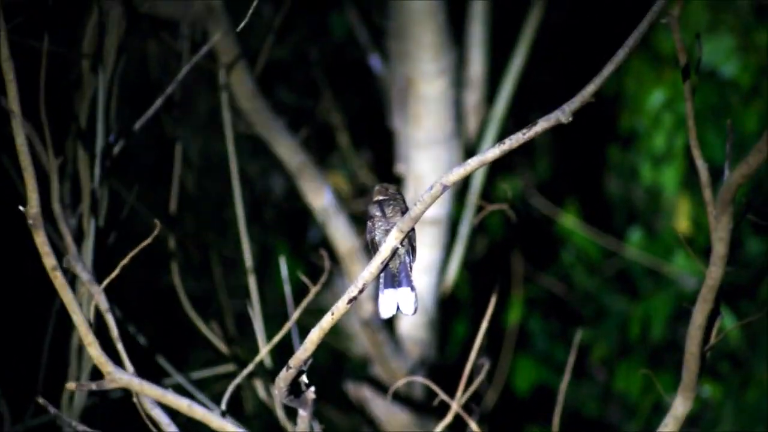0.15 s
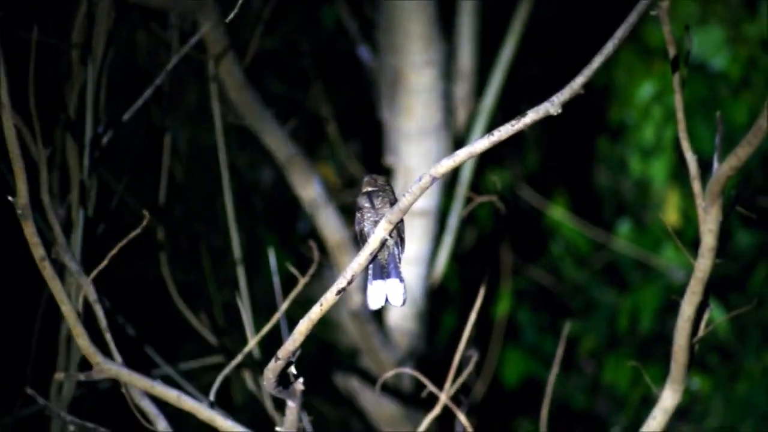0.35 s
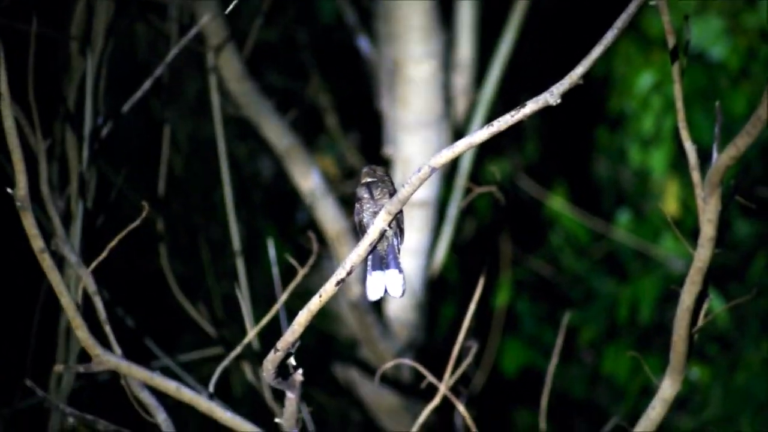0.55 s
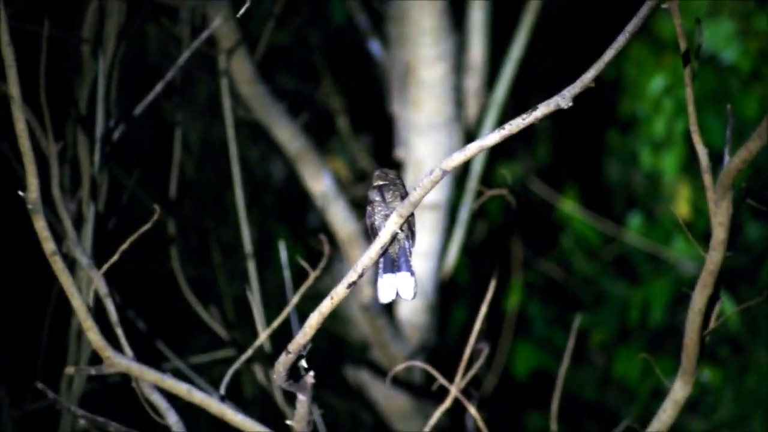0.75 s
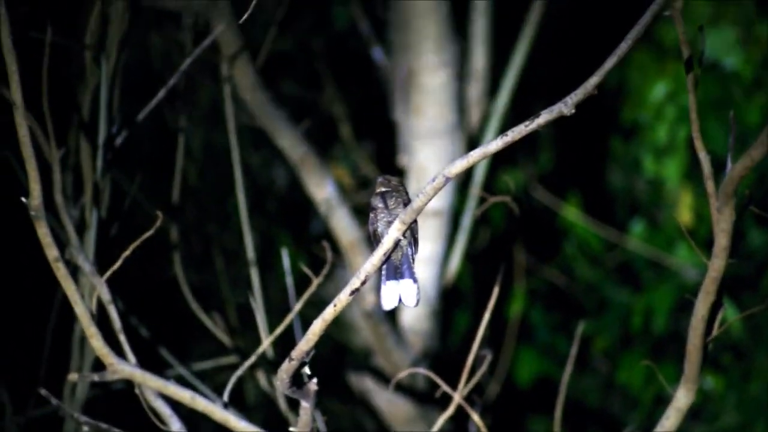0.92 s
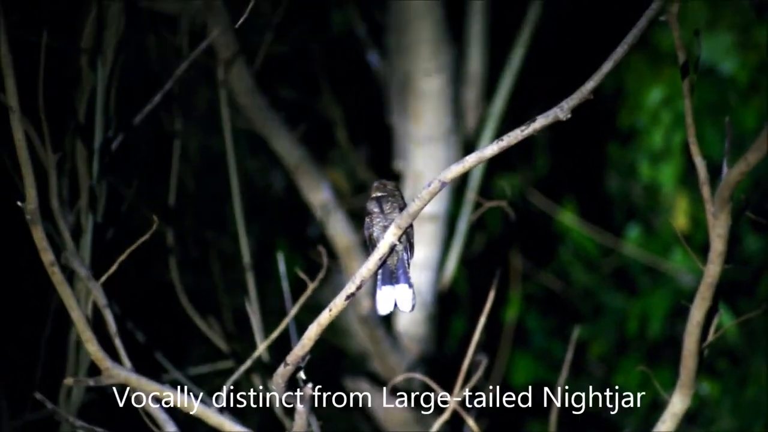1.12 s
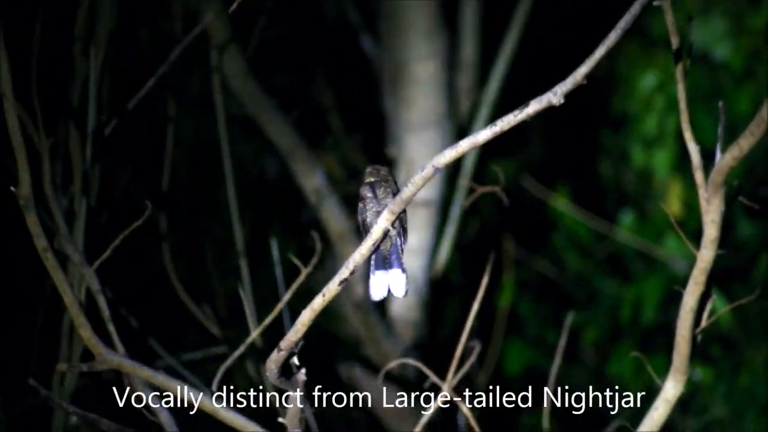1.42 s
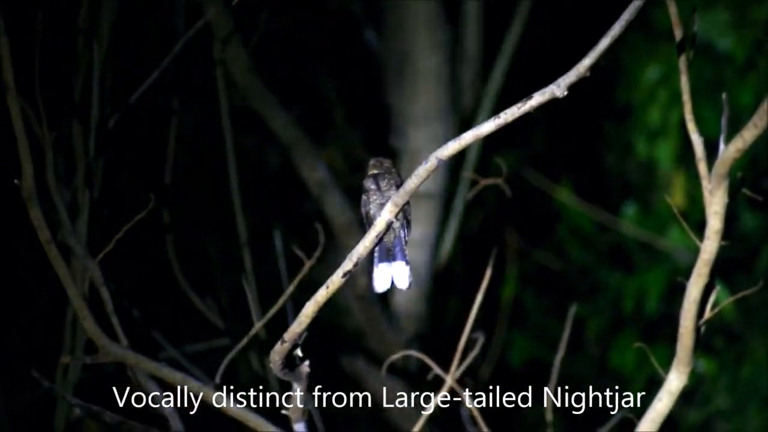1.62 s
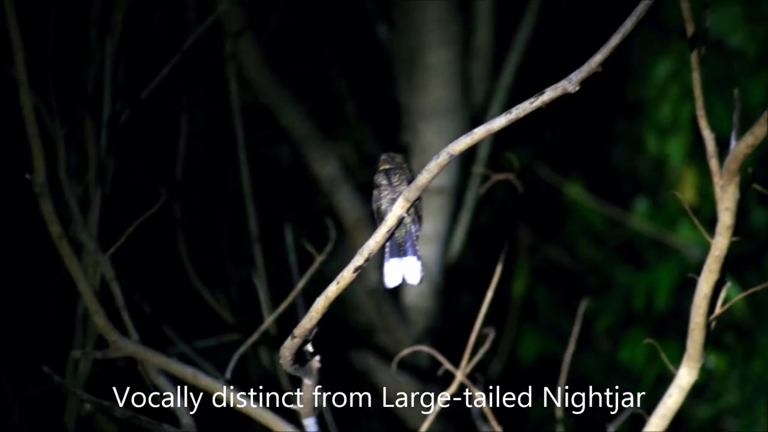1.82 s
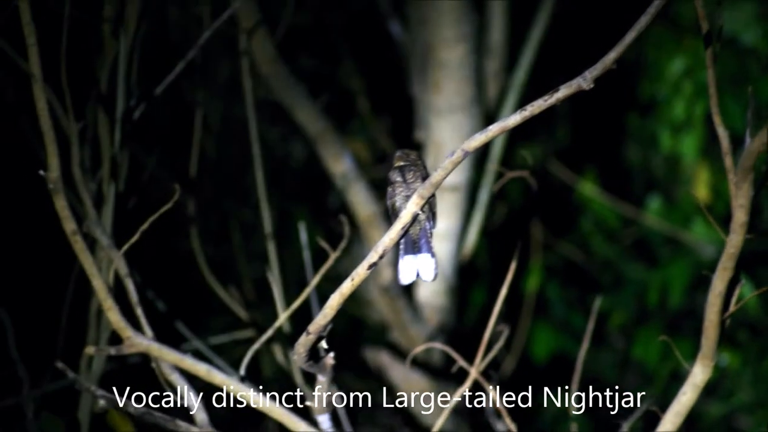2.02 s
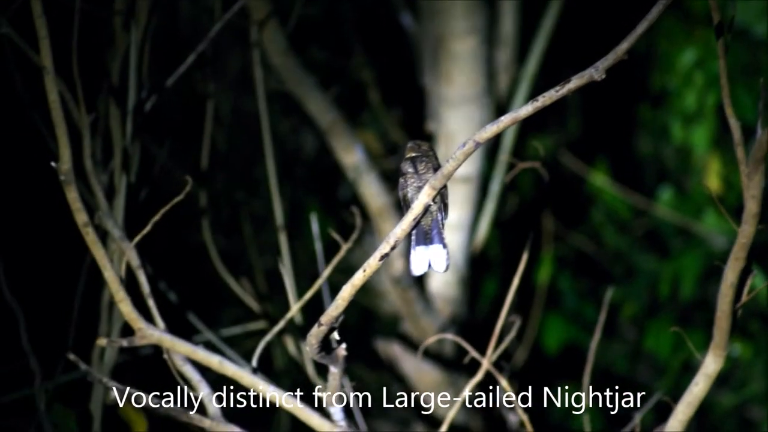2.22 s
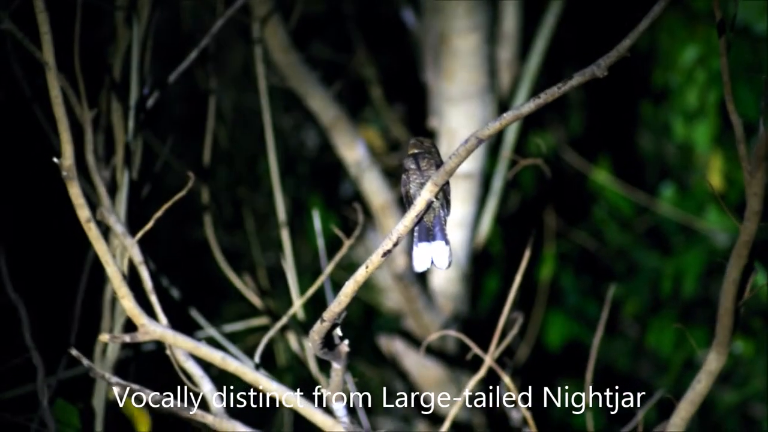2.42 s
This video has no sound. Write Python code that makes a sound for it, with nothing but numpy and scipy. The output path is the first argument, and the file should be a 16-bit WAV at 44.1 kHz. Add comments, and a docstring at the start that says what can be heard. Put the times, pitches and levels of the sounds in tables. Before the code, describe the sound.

In a forest at night, a nightjar near the microphone gives an even run of short, plunging, knock-like notes that echo briefly off the trees. Soft hiss and faint insects continue behind, joined by small ticks and a slight rustle.

```python
"""Nightjar in a night forest

A nightjar on a branch repeats one short, knocking note about 3.5 times a second.
Each note is a whistle that plunges, breaks to a lower register and falls away; ground and trees echo it.
Behind it sit a steady hiss, faint insect choruses, a few small ticks and a soft rustle."""
import sys
import numpy as np
from scipy import signal
from scipy.fft import rfft, irfft
from scipy.io import wavfile
from scipy.ndimage import uniform_filter1d

SR = 44100
rng = np.random.default_rng(int(sys.argv[2]) if len(sys.argv) > 2 else 0)


def transcribe(signal):
    """Save signal, clipped to [-1, 1], as a 16-bit WAV file at the path in sys.argv[1]."""
    frames = np.atleast_2d(signal).T
    limited = np.clip(frames, -1, 1)
    pcm = np.round(limited * 32767).astype(np.int16)
    wavfile.write(sys.argv[1], SR, pcm)


N = 112454


def undb(db):
    """Decibels to gain."""
    return 10 ** (np.asarray(db) / 20)


def unit(x):
    """Scale to rms 1."""
    return x / np.sqrt(np.mean(x ** 2) + 1e-20)


def eq(x, gain):
    """Filter by a gain that is a function of frequency."""
    hz = np.maximum(np.arange(len(x) // 2 + 1) * SR / len(x), 1)
    return irfft(rfft(x) * gain(hz), len(x))


def coloured_noise(curve):
    """Noise of rms 1, shaped by an EQ curve of (freq_hz, gain_db) points."""
    hz, db = np.array(curve).T
    return unit(eq(rng.standard_normal(N), lambda f: undb(np.interp(np.log(f), np.log(hz), db))))


def band_noise(hz, half_width_hz):
    """Noise through the same resonance twice, for steep sides."""
    return eq(rng.standard_normal(N),
              lambda f: 1 / (1 + 1j * (f * f - hz * hz) / (2 * f * half_width_hz)) ** 2)


def drift(rate_hz, size=N):
    """Smooth random modulation, spread near 1."""
    hold = max(int(SR / rate_hz), 1)
    steps = np.repeat(rng.standard_normal(size // hold + 1), hold)
    return uniform_filter1d(steps, hold)[:size]


# Pitch and level envelope of the note, before each call varies it: time_s, pitch_hz, level_db
WHISTLE_CONTOUR = [(0, 1340, -20.2), (.0035, 2100, -33), (.006, 1858, -23.5), (.0125, 1450, -18.3),
                   (.0147, 1640, -20.2), (.0167, 892, -24.3), (.0205, 730, -35), (.025, 894, -22.6),
                   (.0335, 1035, -20.7), (.0355, 1110, -28), (.044, 650, -35), (.053, 620, -39),
                   (.059, 810, -34), (.066, 810, -37)]
BREAK_S, UPTURN_S, ATTACK_S, RELEASE_S = 0.029, 0.063, 0.00089, 0.012
THROAT_HZ, THROAT_HALF_WIDTH_HZ = 4420, 320


def whistle(t, pitch_ratio, stretch, ending_db):
    """One nearly pure note; its low register wavers and ends in a soft upturn."""
    times, hz, db = np.array(WHISTLE_CONTOUR).T
    note_s = np.where(t > BREAK_S, BREAK_S + (t - BREAK_S) / stretch, t)
    waver = 1 + 0.024 * drift(200, len(t)) * (note_s > BREAK_S)
    pitch_hz = pitch_ratio * waver * np.interp(note_s, times, hz)
    phase = 2 * np.pi * np.cumsum(pitch_hz * (note_s > 0)) / SR
    # The third harmonic lifts as it sweeps through the throat resonance.
    third = undb(-30) / (1 + ((3 * pitch_hz - THROAT_HZ) / THROAT_HALF_WIDTH_HZ) ** 2)
    attack = np.clip(note_s / ATTACK_S, 0, 1)
    release = np.clip(1 + (times[-1] - note_s) / RELEASE_S, 0, 1)
    ending = np.clip((note_s - UPTURN_S) / RELEASE_S, 0, 1)
    level = undb(np.interp(note_s, times, db) + ending_db * ending)
    return attack * release * level * (np.sin(phase) + third * np.sin(3 * phase))


# The bird's calls: start_s, gain_db, pitch_ratio, low_register_stretch_ratio, ending_gain_db
CALLS = [(-.068, 0, 1.025, 0.97, -14), (0.2143, 0, 1.005, 1.1, -8), (0.4942, 0.14, 1.001, 1.09, -7),
         (0.7801, 0.4, 1.01, 1.1, -2), (1.0584, -0.26, 1, 1.09, -11), (1.338, -0.5, 0.99, 0.98, -4),
         (1.6225, -0.5, 1, 1.023, 1), (1.9135, -0.15, 1, 0.98, -6), (2.2061, -.7, 0.99, .99, -5)]


def nightjar(t):
    """The dry voice: one whistle repeated, a little different each time."""
    return sum(undb(db) * whistle(t - start, pitch_ratio, stretch, ending_db)
               for start, db, pitch_ratio, stretch, ending_db in CALLS)


# Early reflections off ground and trunks: delay_s, signed_gain
EARLY_REFLECTIONS = [(.00342, .7), (.00497, -.09), (.00879, .26), (.02091, -.16), (.0341, .11)]
LIFT_DB, LIFT_HZ, LIFT_HALF_WIDTH_HZ = 3, 1644, 120  # the trees return this band best
TILT_DB_PER_OCTAVE, TILT_PIVOT_HZ = 1.5, 1230


def among_trees(voice, t):
    """The voice with early reflections, then brighter reverb from the thicket and the forest beyond."""
    def send_eq(f):
        lift_db = LIFT_DB / (1 + ((f - LIFT_HZ) / LIFT_HALF_WIDTH_HZ) ** 2)
        tilt_db = TILT_DB_PER_OCTAVE * np.clip(np.log2(f / TILT_PIVOT_HZ), -2, 1)
        return undb(lift_db + tilt_db)

    near = voice + sum(gain * np.interp(t - delay, t, voice) for delay, gain in EARLY_REFLECTIONS)
    send = eq(near, send_eq)
    thicket = undb(-16) * leaf_reverb(send, predelay_s=0.018, t60_s=0.37)
    forest = undb(-20.5) * leaf_reverb(send, predelay_s=0.0556, t60_s=0.36)
    return near + thicket + forest


def leaf_reverb(x, predelay_s, t60_s):
    """Countless small echoes from leaves and trunks that die away evenly at all pitches."""
    age = np.arange(SR) / SR - predelay_s
    envelope = np.clip(age / 0.0074, 0, 1) * np.exp(-np.log(1000) * age / t60_s)
    spectrum = rfft(rng.standard_normal(SR) * envelope)
    flattened = spectrum / np.sqrt(uniform_filter1d(np.abs(spectrum) ** 2, size=100))
    return signal.fftconvolve(x, irfft(flattened, SR))[:len(x)]


# EQ curve of the night air: freq_hz, gain_db
AIR_EQ = [(25, -18), (50, -24), (100, -14.5), (160, -8), (330, -1.5), (700, -1), (1100, -1), (1700, -5.5),
          (2200, -8), (3200, -12), (4300, -14.5), (5400, -17.5), (7600, -18), (8800, -23), (14800, -25),
          (15700, -64)]
AIR_DB, AIR_FLICKER_DB = -48, 0.66


def night_air():
    """A steady, dark hiss whose level flickers slightly."""
    return undb(AIR_DB + AIR_FLICKER_DB * drift(29.27)) * coloured_noise(AIR_EQ)


# Insect choruses: centre_hz, width_hz, level_db, flutter_db
CHORUSES = [(2639, 300, -56, 1.5), (3498, 94, -68, 2.5), (6190, 650, -61, 2), (7464, 600, -63.5, -0.5),
            (15000, 150, -74.5, 2.5)]


def insects():
    """Distant choruses, each a narrow band of noise that flutters."""
    return sum(undb(db) * unit(band_noise(hz, width / 2) * undb(flutter_db * drift(25.02)))
               for hz, width, db, flutter_db in CHORUSES)


# Dips in the ambience's treble: centre_s, gain_db
TREBLE_DIPS = [(.664, -9), (1.133, -9), (1.518, -9), (1.731, -11), (2.285, -9)]
DIP_HALF_LENGTH_S, DIP_ABOVE_HZ = 0.0065, 4900


def dip_treble(bed, t):
    """The top end of the bed ducks for an instant now and then."""
    treble = eq(bed, lambda f: 1 - 1 / (1 + (f / DIP_ABOVE_HZ) ** 6))
    dip_db = sum(db * np.exp(-((t - centre) / DIP_HALF_LENGTH_S) ** 4) for centre, db in TREBLE_DIPS)
    return bed + (undb(dip_db) - 1) * treble


# Small dry ticks: start_s, level_db, pitch_hz
TICK_HITS = [(.8385, -26, 3200), (1.033, -35, 3500), (1.2019, -20.5, 3400), (1.385, -39, 3000),
             (1.467, -36, 2700), (1.585, -38, 4600), (1.694, -39, 3800), (1.755, -39, 3900),
             (1.797, -34, 3900)]
RING_DECAY_S, TAIL_DECAY_S, TICK_HIGH_CUT_HZ = 0.00024, 0.004, 6000


def ticks(t):
    """Tiny snaps, as of twigs: a cycle or two of ring and a short noisy tail."""
    snaps = np.zeros(N)
    for start, db, hz in TICK_HITS:
        age = np.maximum(t - start, 0)
        ring = np.sin(2 * np.pi * hz * age) * np.exp(-age / RING_DECAY_S)
        tail = unit(band_noise(hz, half_width_hz=1500)) * (t >= start) * np.exp(-age / TAIL_DECAY_S)
        snaps += undb(db) * (ring + undb(-23) * tail)
    return signal.sosfilt(signal.butter(2, TICK_HIGH_CUT_HZ, fs=SR, output="sos"), snaps + 1e-18)


# EQ curve of the rustle: freq_hz, gain_db
RUSTLE_EQ = [(800, -10), (2500, 7.5), (4200, 9), (7000, -6.5), (10000, -11), (14500, -7), (15500, -20)]
# Rustle swells: start_s, length_s, level_db
RUSTLE_SWELLS = [(1.165, 0.1, -56), (1.656, 0.24, -55), (1.993, 0.15, -50)]


def rustle(t):
    """Soft, grainy swells, as of leaves: quick in, slow out."""
    swells = sum(undb(db) * np.interp(t, [start, start + 0.16 * length, start + length], [0, 1, 0])
                 for start, length, db in RUSTLE_SWELLS)
    noise = coloured_noise(RUSTLE_EQ)
    grain = undb(3.9 * drift(300))
    return swells * noise * grain


def scene():
    """The bird up front over the night ambience, in mono."""
    preroll = SR // 2  # the first call is already sounding as the scene opens
    bird_t = np.arange(-preroll, N) / SR
    t = bird_t[preroll:]
    bird = undb(0.5) * among_trees(nightjar(bird_t), bird_t)[preroll:]
    bed = dip_treble(night_air() + insects(), t)
    return (bird + bed + ticks(t) + rustle(t))[None]


def record(dry):
    """The recorder thins the bass and cuts the top steeply."""
    low_cut = signal.butter(2, 102, "high", fs=SR, output="sos")
    high_cut = signal.ellip(10, 0.1, 80, 15600, fs=SR, output="sos")
    return signal.sosfilt(high_cut, signal.sosfilt(low_cut, dry))


dry = scene()
out = record(dry)
transcribe(out)
```